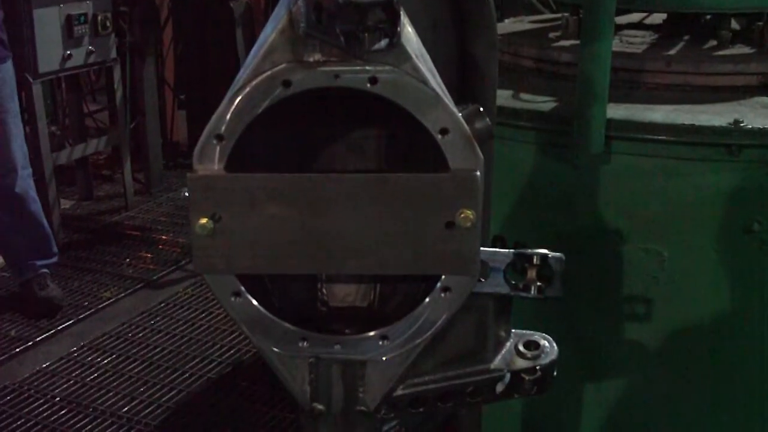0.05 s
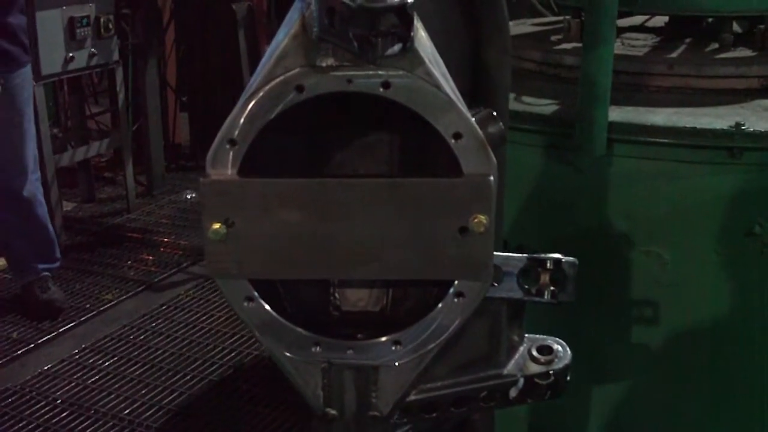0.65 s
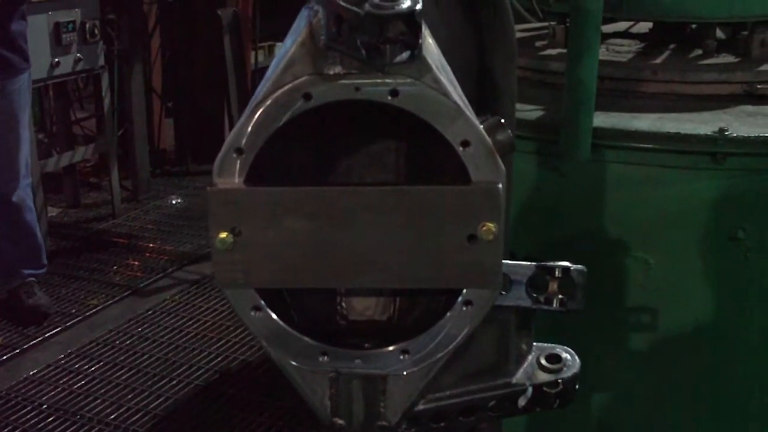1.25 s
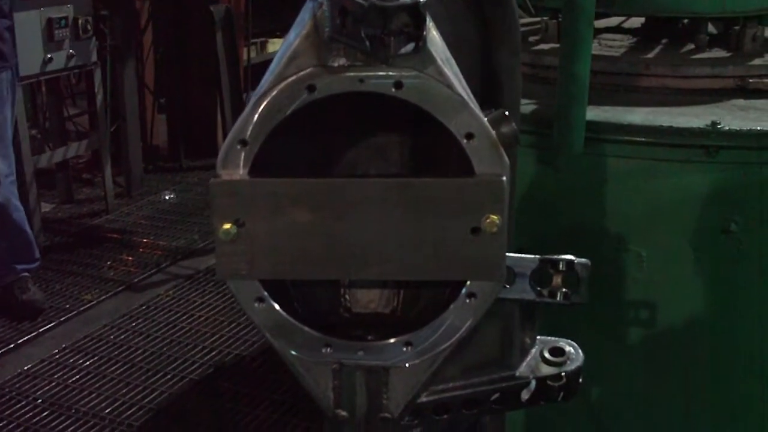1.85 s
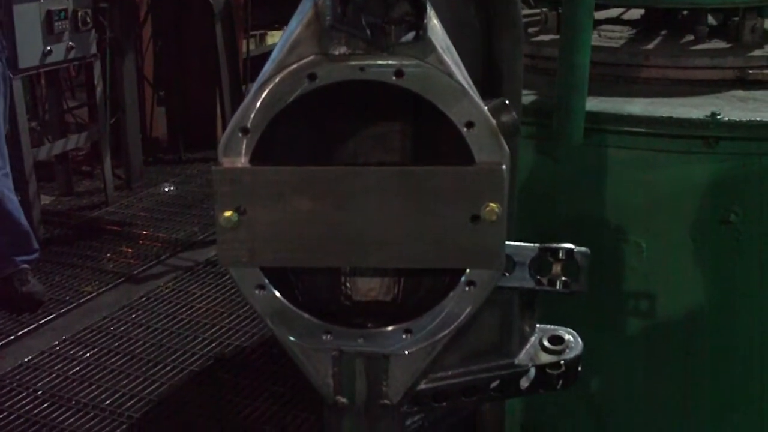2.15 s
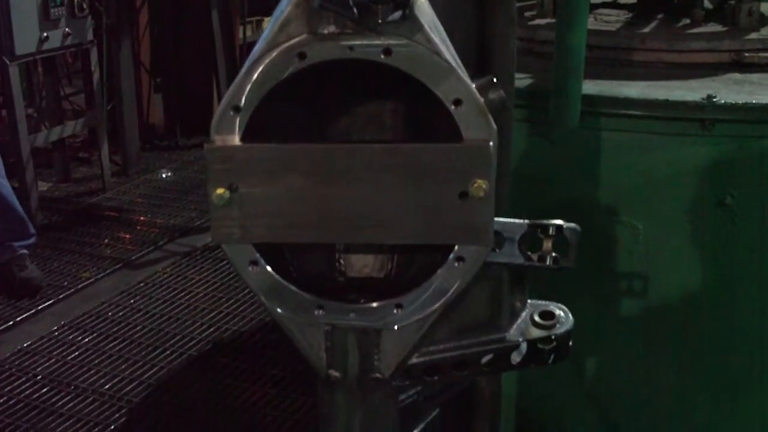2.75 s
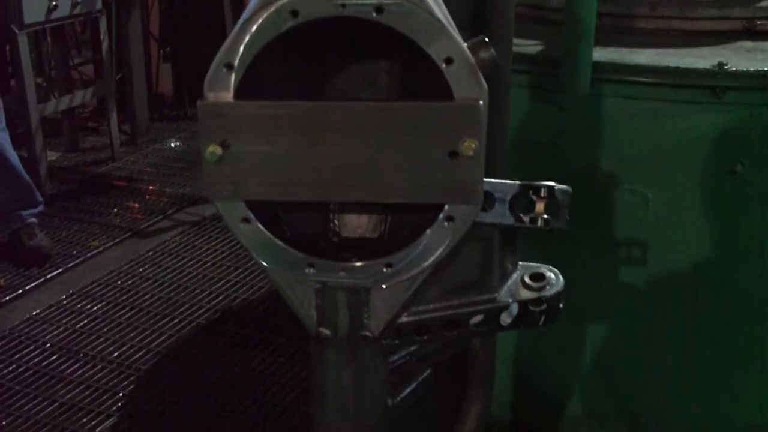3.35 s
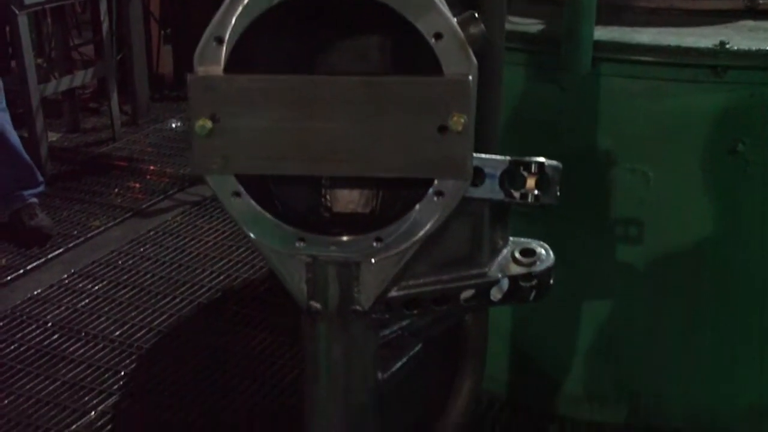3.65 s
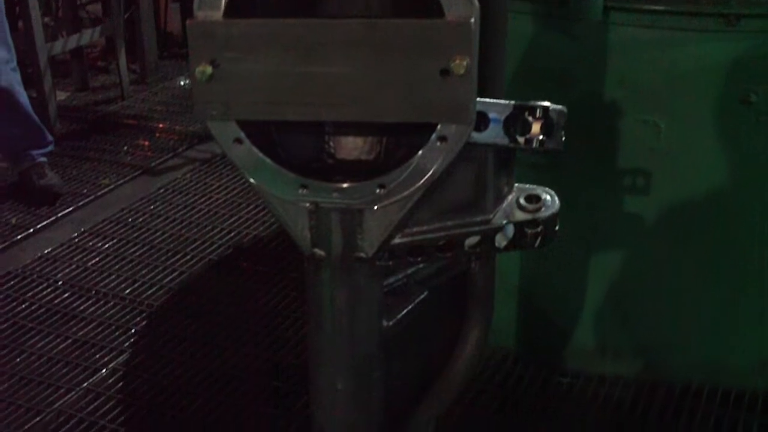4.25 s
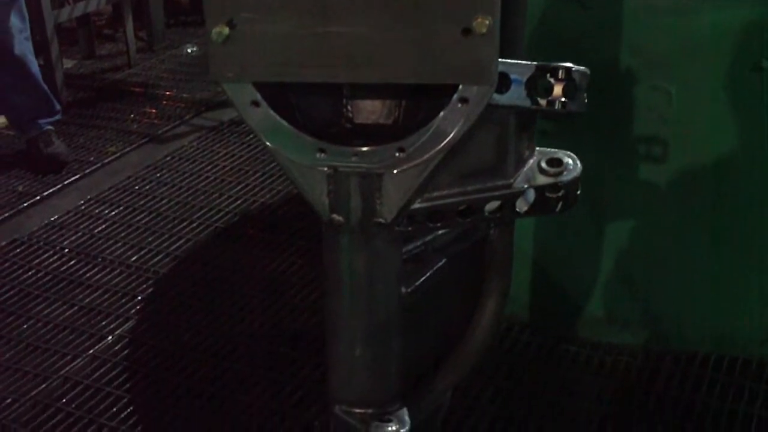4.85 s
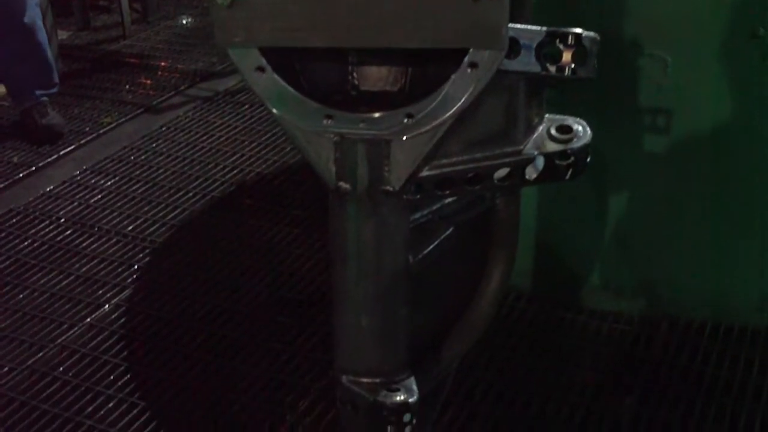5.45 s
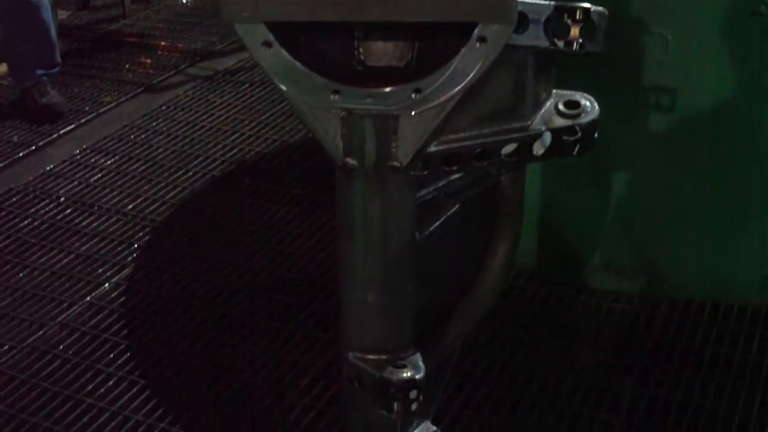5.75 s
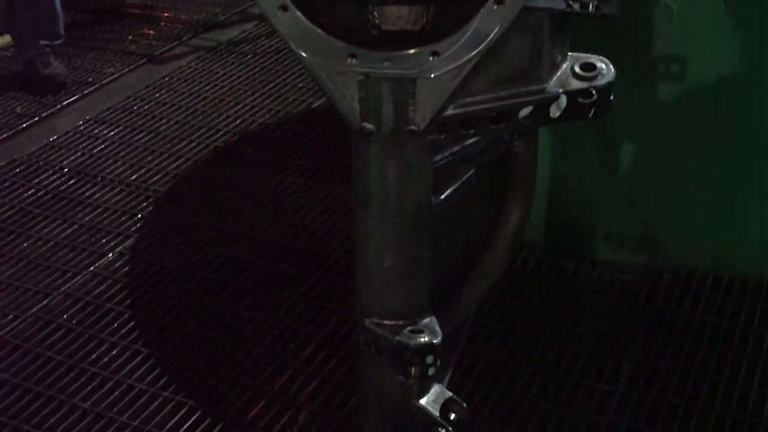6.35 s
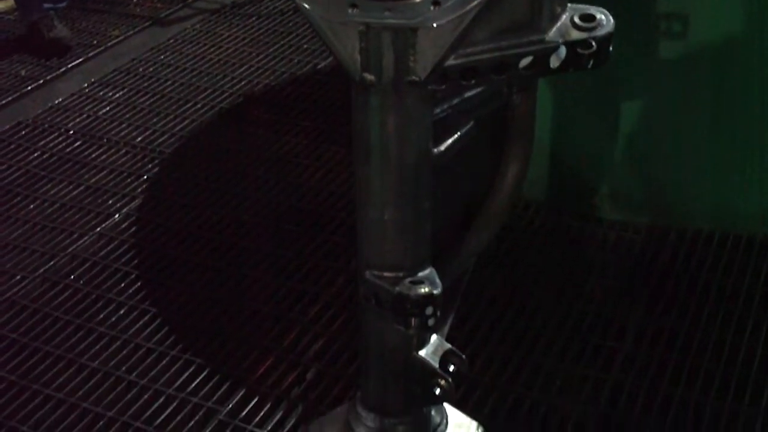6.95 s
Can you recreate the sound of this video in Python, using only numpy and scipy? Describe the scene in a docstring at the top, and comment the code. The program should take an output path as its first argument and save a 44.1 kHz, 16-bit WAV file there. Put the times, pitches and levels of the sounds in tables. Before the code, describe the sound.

From one position inside a big workshop, a dense low rumble of furnaces and machinery runs from start to finish. Air rushes through ducts with a thin hiss on top, and several motors hum at unsteady pitches. The low drone of a large fan rises and falls now and then. Under the roar, a fast pump throbs, its knocking casing and clapping valves blurred by the echo of the hall.

```python
"""A furnace hall at full load. Swirling air makes a steady, churning roar with two deep booms
under it, and blown air rushes and hisses above it. A piston pump, half buried in the roar,
turns about eleven times a second, knocking its casing and clapping its valves. A big fan
drones low and swells now and then, and motors add wavering hums."""
import sys
import numpy as np
from scipy import signal
from scipy.fft import rfft, irfft, next_fast_len
from scipy.io import wavfile
from scipy.ndimage import uniform_filter1d, map_coordinates

SR = 44100
rng = np.random.default_rng(int(sys.argv[2]) if len(sys.argv) > 2 else 0)


def inscribe(sig):
    """Save sig as 16-bit PCM at rate SR to the path in sys.argv[1].

    A 1-D sig is mono; a 2-D sig holds one channel per row.
    Samples are clipped to [-1, 1] before scaling.
    """
    pcm = np.round(np.clip(np.atleast_2d(sig).T, -1, 1) * 32767)
    wavfile.write(sys.argv[1], SR, pcm.astype(np.int16))


N = 308700  # 7 seconds
PUMP_HZ = 10.8  # turns of the pump's shaft each second
TOP_HZ = 7300


def amp(db):
    """Turn decibels into a gain to multiply by."""
    return 10 ** (np.asarray(db) / 20)


def unit(x):
    """Scale a signal to an average (rms) level of 1."""
    return x / np.sqrt(np.mean(x ** 2) + 1e-20)


def wobble(rate):
    """A smooth curve through `rate` random points a second."""
    points = rng.standard_normal(int(N * rate / SR) + 4)
    return map_coordinates(points, [np.arange(N) * rate / SR])


def swelling(swells, churn_db, rate):
    """A gain that rises or dips smoothly at the listed times, with a random wobble on top."""
    t = np.arange(N) / SR
    arches_db = sum(db * np.cos(np.pi * np.clip((t - middle) / length, -.5, .5)) ** 2
                    for middle, length, db in swells)
    return amp(arches_db + churn_db * wobble(rate))


def steadied(x, seconds):
    """Even out the slow swells of a signal, holding its level near 1."""
    power = uniform_filter1d(x ** 2, size=max(int(seconds * SR), 1))
    return x / np.sqrt(np.abs(power) + 1e-6)


def filtered(x, response):
    """Multiply each frequency f in a signal by response(f)."""
    size = next_fast_len(N + SR // 2)
    freqs = np.fft.rfftfreq(size, 1 / SR)
    return irfft(rfft(x, size) * response(freqs), size)[:N]


def ring(x, modes):
    """A struck body rings at its own pitches, called modes."""
    def response(f):
        return sum((-1) ** k * amp(db) * 1j * f * width / (hz * hz - f * f + 1j * f * width)
                   for k, (hz, width, db) in enumerate(modes))
    return filtered(x, response)


def rush(spectrum, patchy_db):
    """Swirling air: noise at level 1, shaped by a spectrum, with random loud and soft patches."""
    grid = signal.stft(rng.standard_normal(N), nperseg=512)[2]  # frequency by time
    patches = uniform_filter1d(rng.standard_normal(grid.shape), size=6, axis=0)
    patches = uniform_filter1d(patches, size=12, axis=1)
    noise = signal.istft(grid * amp(patchy_db * unit(patches)), nperseg=512)[1][:N]
    hz, db = np.transpose(spectrum)
    return unit(filtered(noise, lambda f: amp(np.interp(np.log(f + 1), np.log(hz + 1), db, right=-120))))


def tone(hz, drift, waver_db):
    """A tone whose phase (by `drift` radians) and level wander as the air in the hall moves."""
    phase = 2 * np.pi * (hz * np.arange(N) / SR + rng.random()) + drift * wobble(3)
    return unit(np.sin(phase) * amp(waver_db * wobble(4)))


def hall(x, t60, wet_db):
    """The walls answer every stroke with the same echo, which fades by 60 dB in t60 seconds."""
    t = np.arange(SR) / SR
    tail = rng.standard_normal(SR) * amp(-60 * t / t60)
    echo = signal.fftconvolve(x, tail / np.linalg.norm(tail))[:N]
    return unit(x + amp(wet_db) * echo)


def motors():
    """Each motor hums at its own unsteady pitch; together they swell now and then."""
    # the hums around the hall: f/Hz, level before swells/dB, phase drift/rad
    hums = [(184.3, -39.5, 2.5), (222, -40, 1.5), (279.3, -41, 0.45), (360.3, -38.5, 1), (402, -42, 0.92),
            (413.6, -44, 0.53), (541, -46, 0.59), (666.5, -38.8, 1), (727, -45, .5), (746, -45.5, 1.2),
            (772, -45, 0.83), (826, -44, 1.5), (839, -45.5, 0.9), (947, -45.5, .5), (960, -42, 1.4),
            (1173, -52, .5), (1421, -45, 1.5), (1470, -51, 1.4), (1567.4, -56.5, 0.89), (1856, -60, 1.3)]
    # their swells and dips: middle t/s, length/s, level change/dB
    swells = [(1.4, .26, 4), (1.8, .35, 2.5), (2.25, .4, -2)]
    humming = sum(amp(db) * tone(hz, drift, waver_db=2.5) for hz, db, drift in hums)
    return swelling(swells, churn_db=.2, rate=3) * humming


def fan():
    """The big fan's blades drone low, and swirls of air smear part of the tone."""
    # the drone's swells: middle t/s, length/s, level change/dB
    swells = [(1.58, 0.5, 7), (2.16, 0.56, 8), (2.72, 0.43, 9.5), (3.15, 0.45, 2.5), (4.55, 0.38, 7.5),
              (6.15, .5, 4), (6.9, .5, 2.5)]
    drone_hz = 123.5
    drone = tone(drone_hz, drift=1.3, waver_db=1.0)
    smear = .45 * tone(drone_hz, drift=3.34, waver_db=4.5)
    return amp(-29) * swelling(swells, churn_db=0.5, rate=2.2) * steadied(drone + smear, seconds=.3)


def air():
    """Blown air rushes through the ducts; the thin hiss on top lifts a little at each pump turn."""
    # spectra of the blown air and the hiss: f/Hz, relative level/dB
    blower_spectrum = [(350, -29.5), (550, -6.5), (630, 1), (780, 0), (835, -0.5), (890, -1), (950, -3.5),
                       (1050, -6), (1210, -10), (1330, -8.5), (1420, -5.5), (1500, -11), (1680, -13.5),
                       (1850, -23.5), (3000, -55)]
    hiss_spectrum = [(900, -23.5), (1700, -3), (2100, 0), (2400, 1.5), (2950, -1.5), (3350, -6),
                     (3750, -4.5), (4600, -9.5), (5000, -13), (5250, -12), (5500, -18.5), (5800, -17),
                     (6100, -26), (7200, -35)]
    # their swells and dips: middle t/s, length/s, level change/dB
    blower_swells = [(1.7, .8, 1), (2.17, 0.27, -2), (5.2, 0.23, 2), (6.4, 1, -0.5)]
    hiss_swells = [(0, .6, 0.5), (.92, .4, 1.2), (1.7, 0.98, 1), (4.75, .3, 0.5)]
    blower = swelling(blower_swells, churn_db=0.5, rate=3)
    blower *= steadied(rush(blower_spectrum, patchy_db=0.56), seconds=0.15)
    turn = np.arange(N) / SR * PUMP_HZ % 1  # runs from 0 to 1 in each turn
    puff = unit(amp(1.5 * np.exp(-turn / 0.41)))
    hiss = swelling(hiss_swells, churn_db=0.3, rate=9.7) * puff
    hiss *= steadied(rush(hiss_spectrum, patchy_db=1.4), seconds=0.17)
    return amp(-25) * blower + amp(-38) * hiss


def strokes(pattern, modes, rattle, decay_s, scatter_db):
    """Blows repeat at every turn of the shaft; each rings a body with a push and a short rattle."""
    share, db = np.transpose(pattern)
    turns = np.arange(int(N / SR * PUMP_HZ) + 1)[:, None]
    chance = rng.standard_normal((len(turns), 2, len(share)))
    times = np.abs((turns + share) / PUMP_HZ + .0005 * chance[:, 0])
    strengths = amp(db + scatter_db * chance[:, 1])
    blows = np.bincount((times * SR).astype(int).ravel(), strengths.ravel(), N)[:N]
    fade = amp(-60 * np.arange(SR // 8) / SR / decay_s)
    rattling = signal.fftconvolve(blows, fade)[:N] * rng.standard_normal(N)
    force = unit(blows) + rattle * unit(rattling)
    low, high = 0.84 * modes[0][0], 1.07 * modes[-1][0]  # just around the body's pitches
    band = signal.butter(2, [low, high], "band", fs=SR, output="sos")
    return unit(ring(signal.sosfilt(band, force), modes))


def pump():
    """Each turn of the piston pump pulses the air, knocks the casing and claps the valves."""
    # tones of the pulsing air: multiple of the shaft speed, level before swells/dB
    pulse_tones = [(3, -36), (9, -30.5), (18, -40), (22, -39)]
    # blows in one turn: position/turns, relative level/dB
    knock_pattern = [(.03, -3), (.225, -5.5), (.5, -11.5), (.58, 0.5), (.82, -10.5)]
    clap_pattern = [(.14, -7), (.63, -5), (.8, -2.5), (.96, -2.5)]
    # pitches at which the metal rings: f/Hz, width/Hz, relative level/dB
    casing_modes = [(631, 82, -1.3), (754, 80, -1.4), (823, 60, -0.28), (954.5, 31, -1.2)]
    valve_modes = [(1335, 66, 0.5), (1414, 70, -1.5), (1625, 330, -7.5)]
    # swells and dips of the valves' whirr and the air's throb: middle t/s, length/s, level change/dB
    whirr_swells = [(.3, 0.88, -6.5), (.9, 0.34, 2.5), (1.35, .25, -4), (1.56, 0.15, 5), (2.46, .25, 5),
                    (3.03, .3, -11), (4.7, .22, 7), (5.65, 0.46, 5.5), (6.5, .4, 5)]
    throb_swells = [(.3, .5, 0), (1.05, 0.6, 3.5), (1.62, .55, -12), (3.85, .5, -0.5), (4.65, 0.39, 4.5),
                    (5.18, 0.55, -10), (6, .6, -5)]
    throb = sum(amp(db) * tone(multiple * PUMP_HZ, drift=0.064, waver_db=1.5)
                for multiple, db in pulse_tones)
    knocks = strokes(knock_pattern, casing_modes, rattle=1.0, decay_s=0.022, scatter_db=0.0)
    claps = strokes(clap_pattern, valve_modes, rattle=0.97, decay_s=0.013, scatter_db=2.0)
    knocking = steadied(hall(knocks, t60=0.79, wet_db=-2.1), seconds=0.13)
    whirr = swelling(whirr_swells, churn_db=1.7, rate=2.7)
    whirr *= steadied(hall(claps, t60=0.76, wet_db=0.5), seconds=.2)
    throb *= swelling(throb_swells, churn_db=0.2, rate=0.99)
    return throb + amp(-31) * knocking + amp(-37.7) * whirr


def furnace():
    """Swirling air makes a broad roar and shakes the hall into a deep rumble and boom."""
    # spectra of the four noises, deepest first: f/Hz, relative level/dB
    bass_spectrum = [(3, -11), (8, -4.5), (45, -3.5), (100, -1.5), (180, -13.5), (400, -48)]
    rumble_spectrum = [(35, -34.5), (48, -15.5), (56, -1), (67, 0), (85, -0.5), (102, -14.5), (150, -49)]
    boom_spectrum = [(80, -33.5), (105, -12.5), (120, -2.5), (134, -1), (150, -0.5), (170, -10),
                     (205, -18.5), (300, -54)]
    roar_spectrum = [(100, -31.5), (180, 1), (222, 1.5), (260, -3), (345, 1), (405, -2.5), (470, -6.5),
                     (540, -9), (900, -28.5)]
    # deep pitches at which the hall rings: f/Hz, level against the rumble's noise/dB
    hall_modes = [(55.8, -9.5), (66.8, -5.5), (78.5, -9)]
    # swells and dips of the noises: middle t/s, length/s, level change/dB
    rumble_swells = [(.03, 0.4, 2), (1.54, 0.27, 4), (1.71, 0.15, -7), (2.3, 0.86, 2), (3.4, 1.4, -5.5),
                     (3.95, .3, 3.5), (4.27, 0.22, 4.5), (4.52, .35, 6), (5.05, 0.92, -6.5),
                     (5.92, .35, 3.5)]
    boom_swells = [(1.36, 0.2, 3.5), (1.88, 0.98, -2), (2.33, 0.26, 2.5), (2.98, 0.76, 3.5),
                   (3.53, 0.19, 2.5), (5.88, 0.28, -3), (6.95, 0.5, 3.5)]
    roar_swells = [(1.4, .2, 1), (2.0, .2, 1.5), (2.33, 0.55, -2.2), (3.55, 1, 1.5), (6.08, 0.54, 1.2)]
    ringing = sum(amp(db) * tone(hz, drift=.8, waver_db=2.5) for hz, db in hall_modes)
    rumble = steadied(rush(rumble_spectrum, patchy_db=0.5) + ringing, seconds=0.18)
    rumble *= swelling(rumble_swells, churn_db=0.7, rate=6.1)
    boom = swelling(boom_swells, churn_db=0.2, rate=8.5)
    boom *= steadied(rush(boom_spectrum, patchy_db=0.8), seconds=0.17)
    roar = swelling(roar_swells, churn_db=0.0, rate=2.8)
    roar *= steadied(rush(roar_spectrum, patchy_db=0.37), seconds=0.18)
    bass = rush(bass_spectrum, patchy_db=1.3)
    return amp(-26.2) * bass + amp(-24.5) * rumble + amp(-23) * boom + amp(-23) * roar


def scene():
    """All the machines, heard from one spot in the hall."""
    return (furnace() + air() + pump() + fan() + motors())[None]


def record(dry):
    """Cut away all the treble above TOP_HZ."""
    return filtered(dry[0], lambda hz: hz < TOP_HZ)[None]


dry = scene()
out = record(dry)
inscribe(out)
```